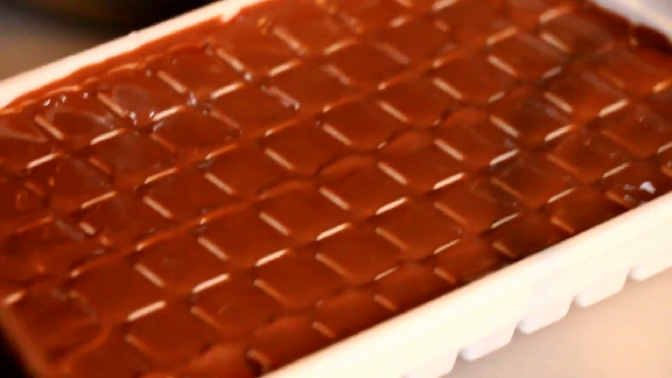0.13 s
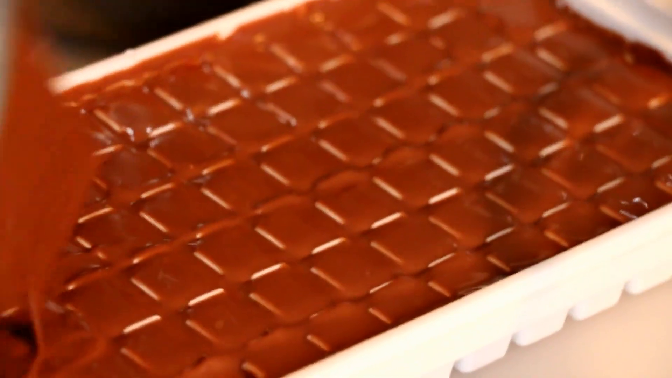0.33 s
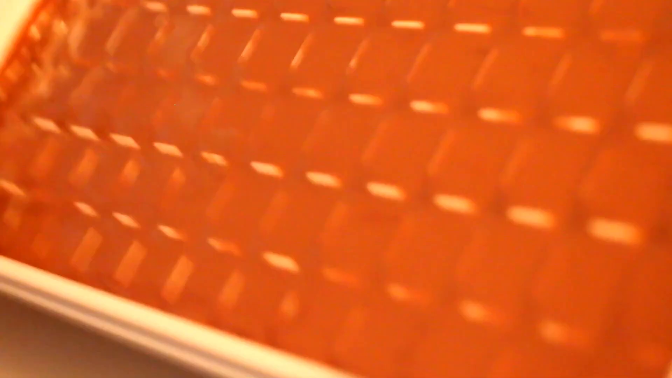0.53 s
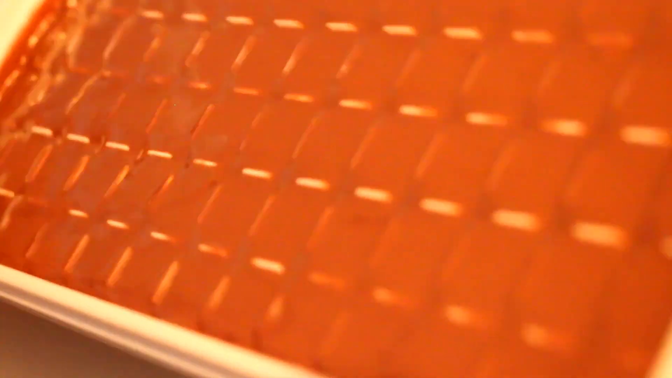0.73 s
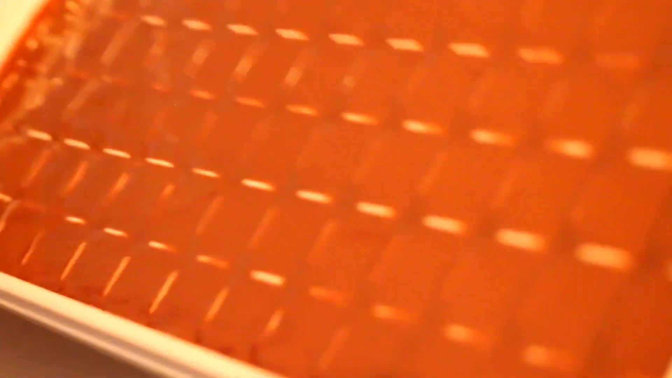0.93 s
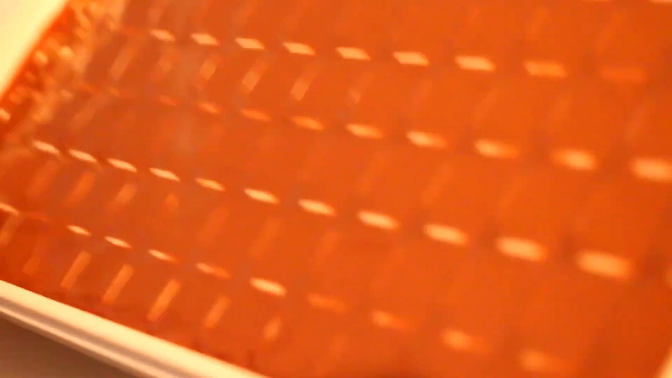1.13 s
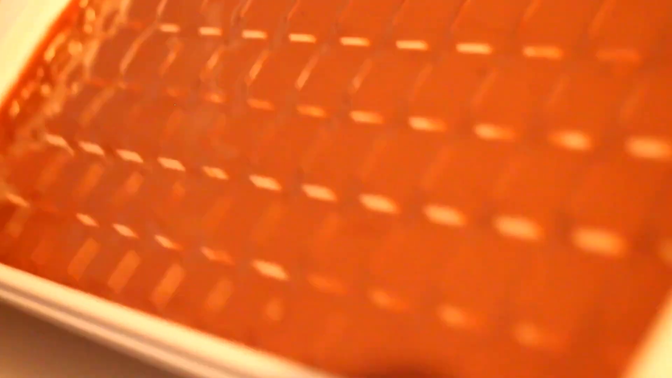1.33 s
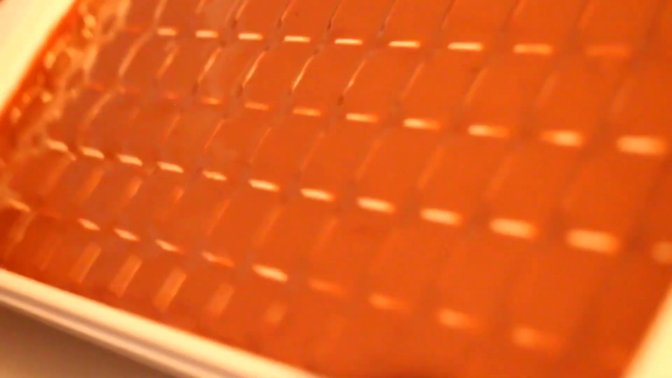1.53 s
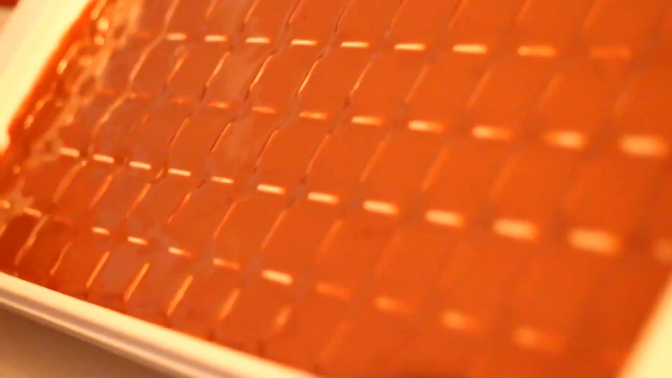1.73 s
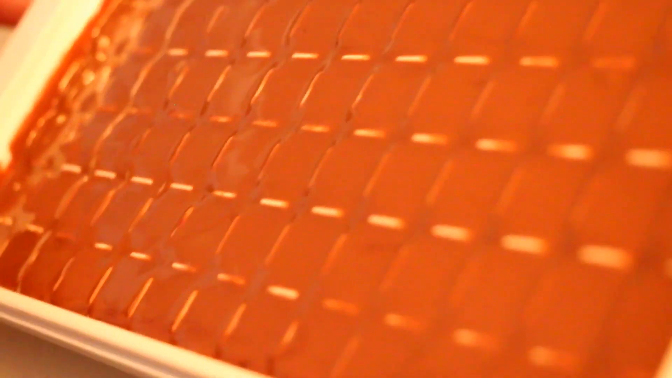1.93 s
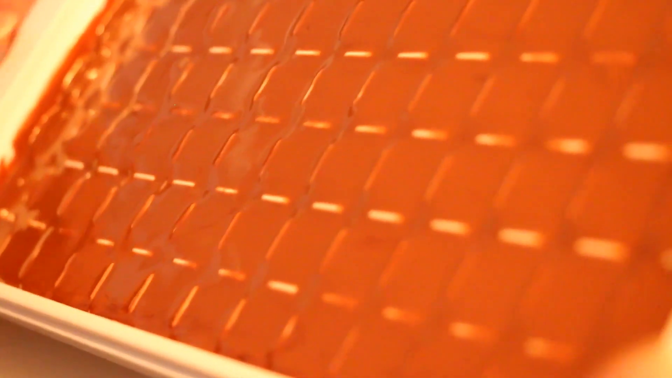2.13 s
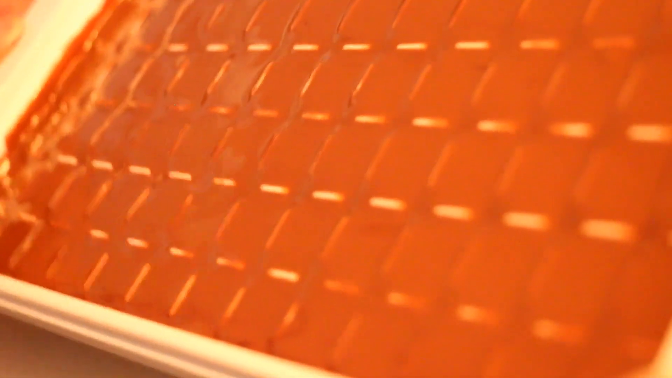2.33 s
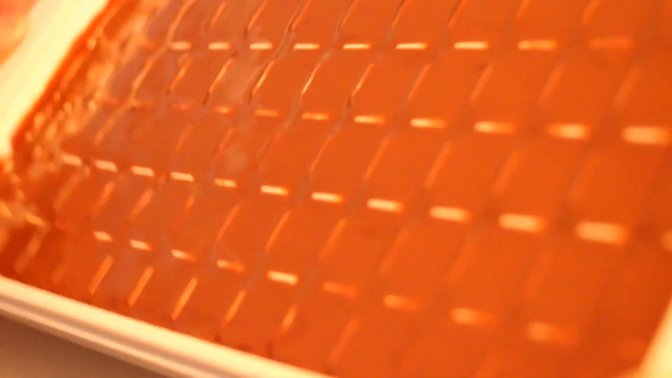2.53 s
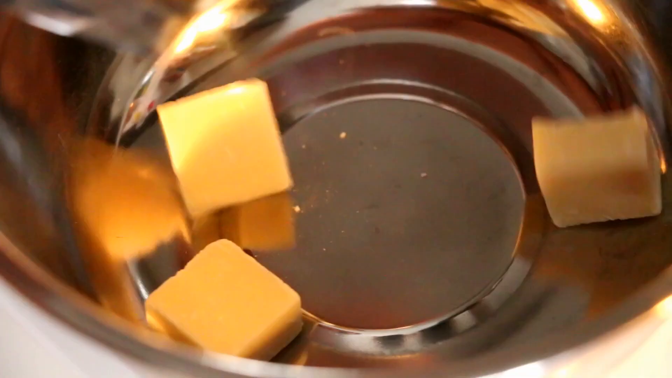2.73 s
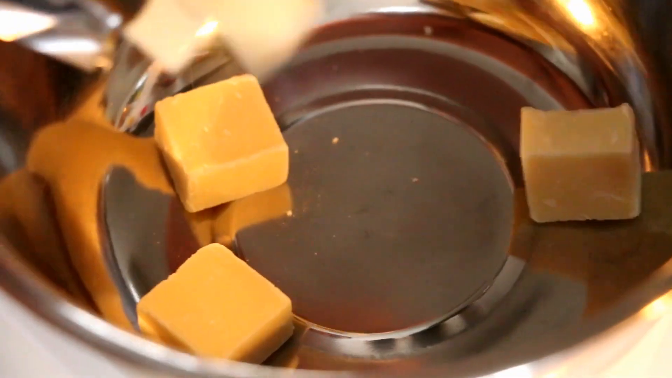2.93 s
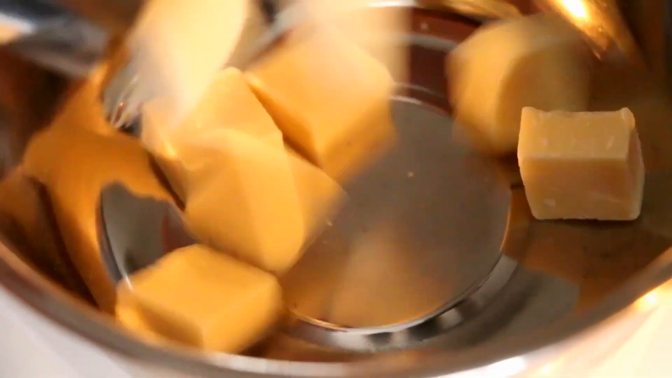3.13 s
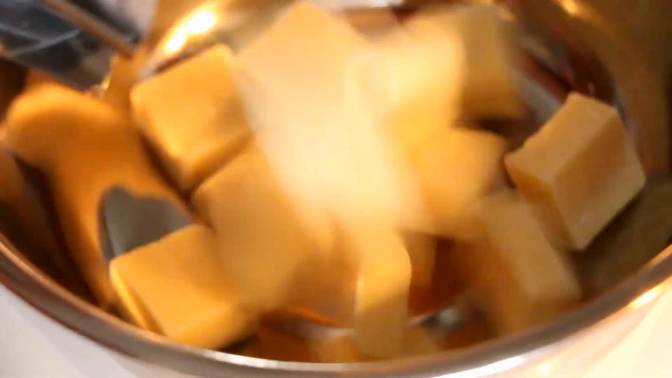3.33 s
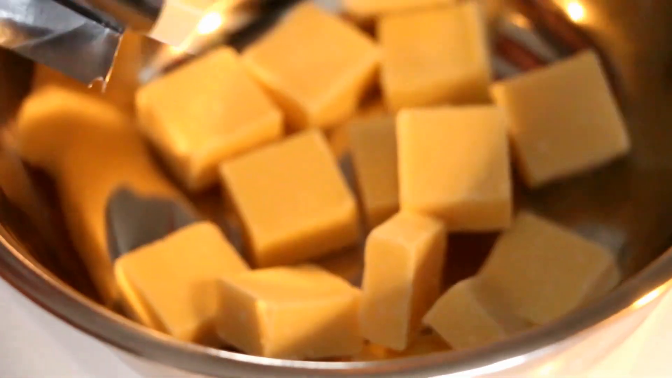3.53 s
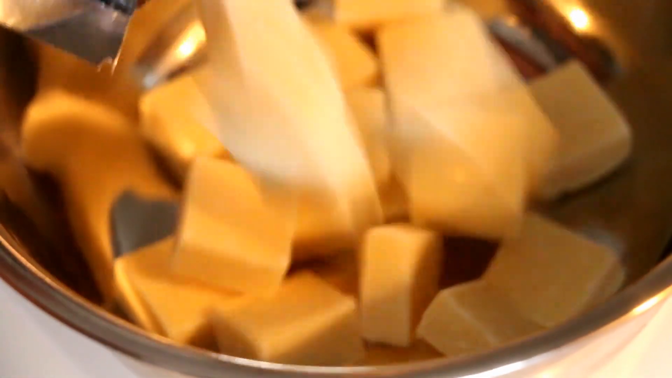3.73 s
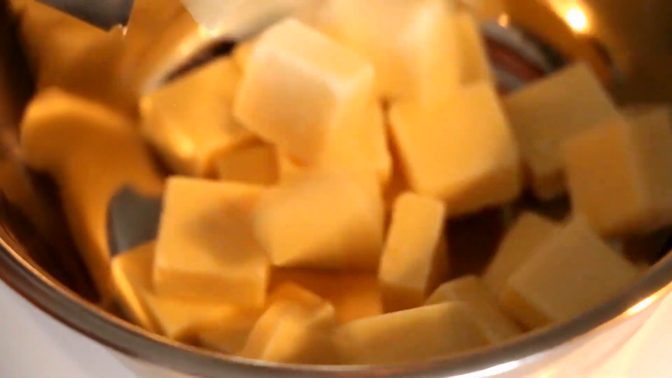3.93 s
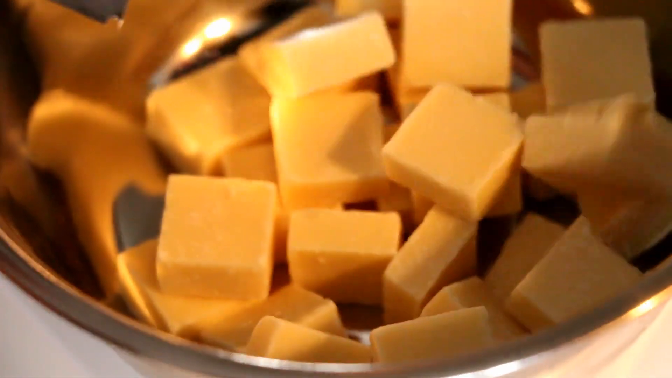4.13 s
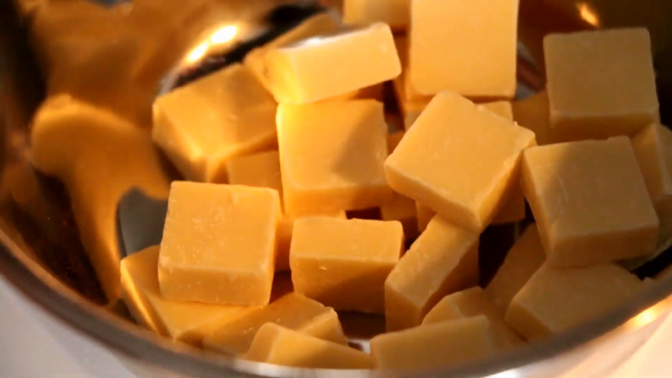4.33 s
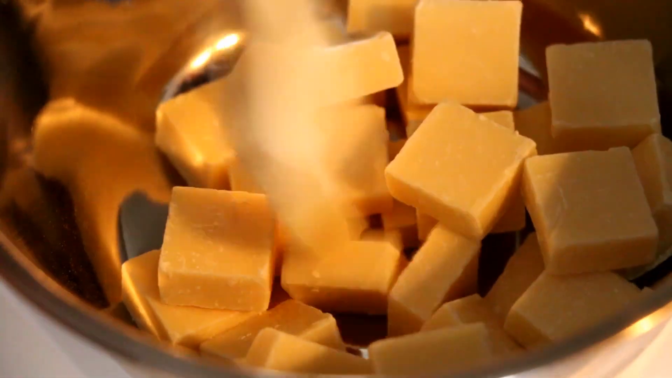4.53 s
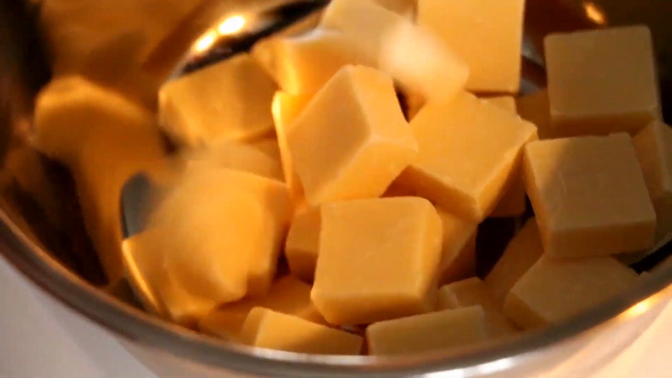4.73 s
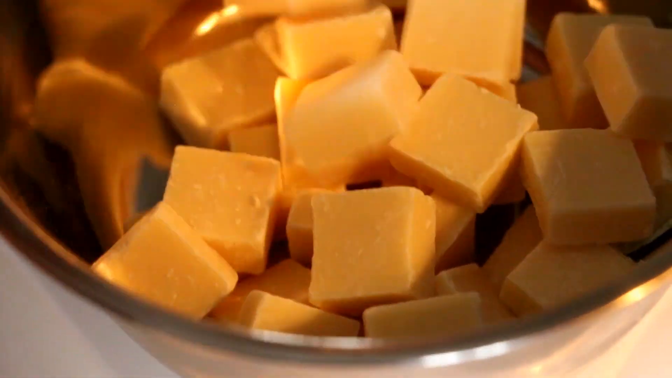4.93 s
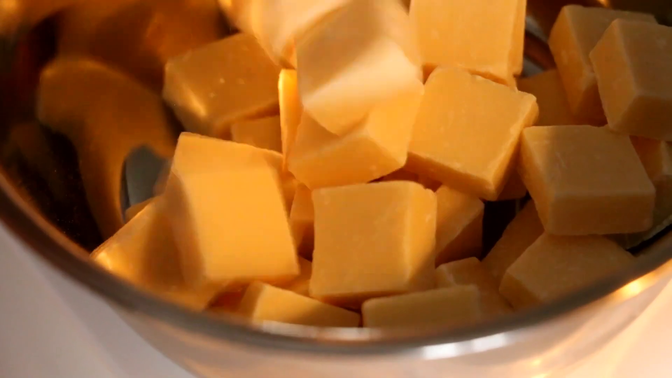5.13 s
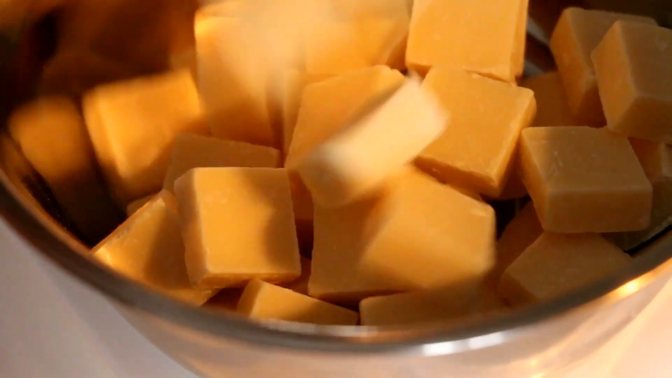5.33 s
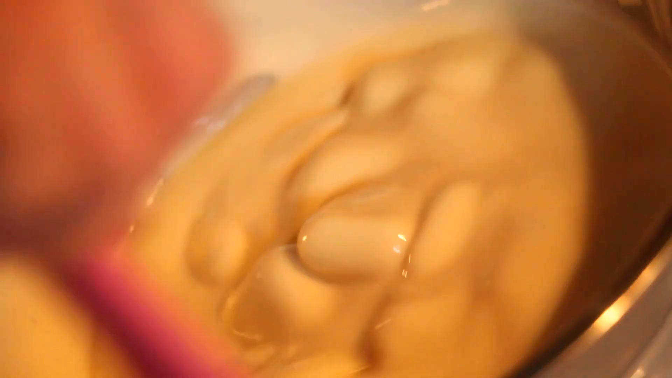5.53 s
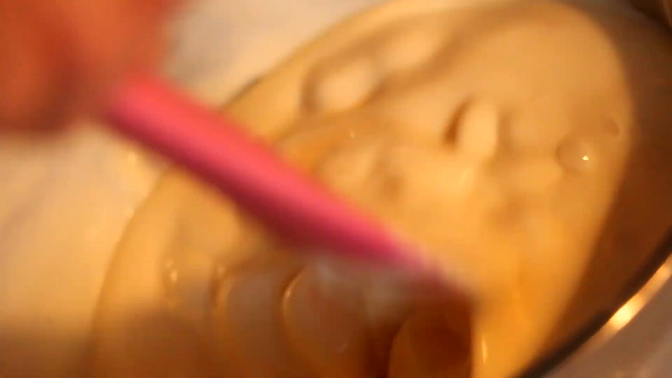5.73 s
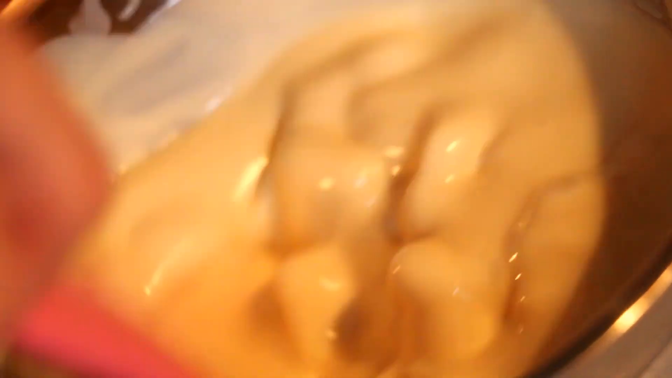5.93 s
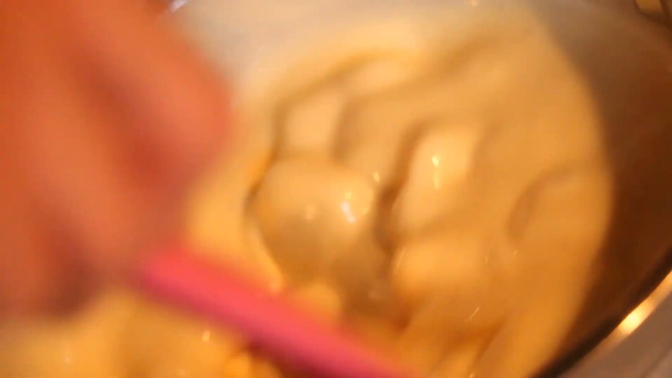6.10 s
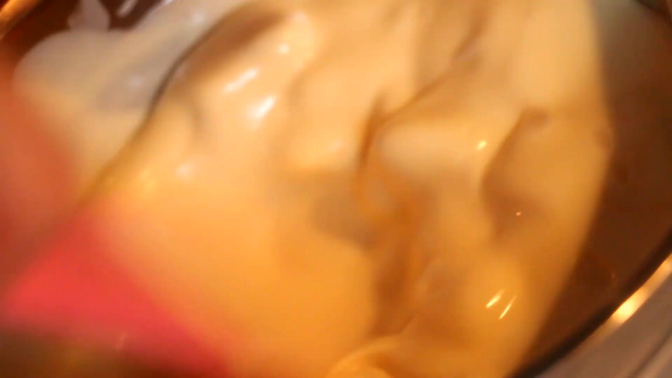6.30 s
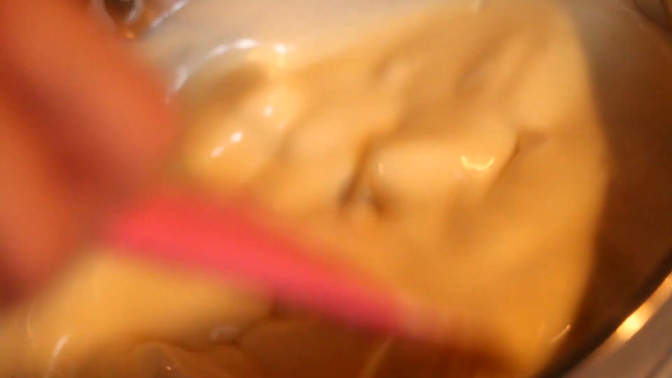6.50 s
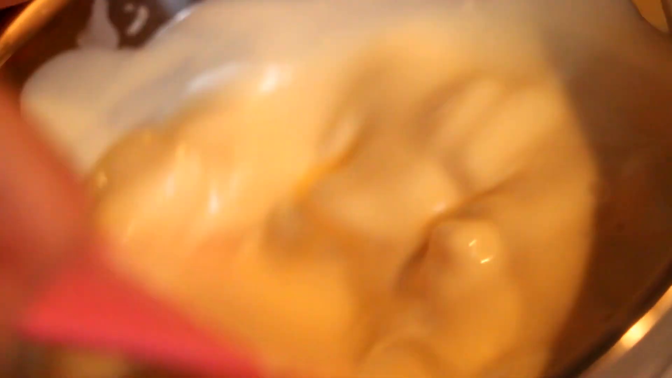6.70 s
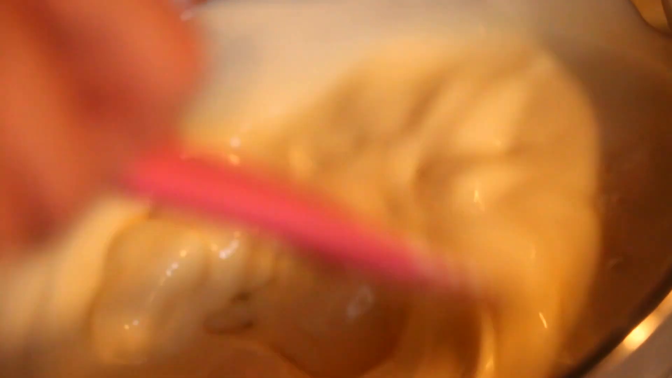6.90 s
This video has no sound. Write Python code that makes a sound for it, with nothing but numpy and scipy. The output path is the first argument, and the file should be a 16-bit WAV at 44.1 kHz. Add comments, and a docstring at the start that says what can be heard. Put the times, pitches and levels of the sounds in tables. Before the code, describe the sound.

Close up in a quiet kitchen, a filled plastic tray knocks down on the counter seven times, fast and firm. A brief gap follows, then hard blocks of chocolate tumble into a steel bowl for nearly three seconds, in an uneven rattle of knocks, clicks and light scrapes, the rim ringing now and then. The rattle cuts off, leaving only the soft hiss and appliance hum that lie underneath throughout.

```python
"""Seven bangs on a kitchen counter, then a clatter of hard chocolate tumbling into a steel bowl.
Each bang is an impact that excites the damped modes of a filled plastic mould. The chocolate blocks
crack against each other and knock the bowl's bottom, which their load damps; the free rim now and then
rings on. A quiet appliance hum and hiss lie under it all, and the loudest blows are softly clipped."""
import sys
import numpy as np
from scipy import signal
from scipy.fft import rfft, irfft
from scipy.io import wavfile

SR = 44100
rng = np.random.default_rng(int(sys.argv[2]) if len(sys.argv) > 2 else 0)


def bounce(signal):
    """Save signal as a 16-bit WAV file at the path given by the first command-line argument."""
    frames = np.transpose(np.atleast_2d(signal))
    limited = np.clip(frames, -1, 1)
    pcm = np.round(limited * 32767).astype(np.int16)
    wavfile.write(sys.argv[1], SR, pcm)


N = 311346

# blocks landing; clack, tick and thud are relative to the level:
# start_s, level_db, clack_db, tick_db, thud_db, bowl_pitch_hz, clack_pitch_hz
LANDINGS = [(2.819, -11, -17, -27, -14, 1330, 2290), (2.861, -8, -18, -16.5, -22.5, 953, 1730),
            (2.868, -15.5, -9, -31, -22.5, 1015, 1920), (2.91, -11, -21, -46, -18, 964, 2580),
            (2.971, -26, -2.5, -3.5, -26, 965, 2210), (3.033, -22, -3.5, -7.5, -21.5, 790, 2800),
            (3.054, -23.5, -25, -28, -2.5, 680, 2240), (3.067, -20.5, -3, -18.5, -32.5, 780, 3200),
            (3.089, -18, -7, -8, -7.5, 790, 2240), (3.118, 7, -18, -24.5, -35.5, 952, 2230),
            (3.128, -7, -30.5, -48.5, -32, 950, 1930), (3.15, -21, -24, -35.5, -26, 1010, 1950),
            (3.174, -2, -23.5, -22, -33.5, 992, 1870), (3.203, -7.5, -7, -22, -23, 1020, 2710),
            (3.21, -13, -9, -23, -29, 1030, 2060), (3.236, -8, -21.5, -28, -27.5, 1054, 3050),
            (3.255, 4.5, -19, -28, -29.5, 1015, 2360), (3.265, -5.5, -32, -35, -38, 964, 2100),
            (3.273, -0.5, -20.5, -32, -48, 1025, 2000), (3.283, -7, -15, -17, -35.5, 1080, 2650),
            (3.29, -5, -38.5, -49, -44, 940, 3900), (3.318, -6, -16, -32, -29, 950, 2320),
            (3.349, -8, -13.5, -36, -26, 925, 2320), (3.368, -7.5, -26, -30, -32, 930, 2420),
            (3.394, 1, -19.5, -34, -28, 1015, 1780), (3.409, -2.5, -13.5, -19, -18.5, 920, 1780),
            (3.417, -6.5, -7.5, -32, -42, 1030, 2550), (3.435, -9.5, -18, -31, -46, 1012, 2730),
            (3.453, -2, -17, -23, -48, 970, 2830), (3.492, -3, -19.5, -39, -28, 710, 2900),
            (3.578, -18.5, -4, -10, -35, 780, 2420), (3.601, -15, -9, -21, -20, 800, 1830),
            (3.636, -12.5, -38, -28.5, -21, 750, 1800), (3.688, -18.5, -12.5, -24, -7.5, 866, 1940),
            (3.753, -25, -6, -27, -4.5, 795, 2210), (3.802, -2.5, -11, -25, -20, 1090, 2560),
            (3.808, 0, -12, -15, -37.5, 1123, 1790), (3.84, -1.5, -15, -34, -20.5, 1130, 2990),
            (3.854, -2, -22, -41, -29, 850, 2360), (3.874, 4.5, -22, -38, -26.5, 745, 2170),
            (3.88, -13, -16, -27, -34, 874, 2400), (3.893, -8.5, -9, -16, -20, 853, 2180),
            (3.928, -11.5, -6.5, -39, -23, 1050, 2400), (3.937, 3, -23.5, -29, -29, 705, 2880),
            (3.975, -3.5, -16, -22, -17, 820, 2260), (4.019, -15.5, -10, -17, -16, 1050, 2480),
            (4.057, -13.5, -8, -21, -35, 1100, 2330), (4.065, -9, -11, -18.5, -12, 950, 2160),
            (4.089, -19, 3.5, -32, -30, 756, 2050), (4.103, -7.5, -9, -24, -31, 620, 2340),
            (4.116, -12.5, -34, -12.5, -15, 930, 2120), (4.172, -19, 1, -16, -35, 844, 1800),
            (4.187, -7, -24, -26, -24, 1150, 2200), (4.309, -20, -36, -37, -35, 713, 2060),
            (4.377, -23, -10.5, -28.5, -13.5, 786, 1800), (4.435, -26.5, -8.5, -45, -6, 870, 3040),
            (4.46, -16.5, -13, -43, -8, 620, 1730), (4.484, -17, -7, -28, -22, 650, 2970),
            (4.549, -21, -11, -19.5, -15, 1270, 2050), (4.573, -25, -14.5, -26, -26.5, 802, 3160),
            (4.63, 4, -12.5, -24.5, -21, 974, 2920), (4.672, -14, -5.5, -25, -10, 1055, 1710),
            (4.704, -18, -4.5, -11, -31, 940, 3540), (4.721, -10.5, -38.5, -26, -16.5, 764, 1930),
            (4.803, -6, -10, -27, -17.5, 735, 2380), (4.85, -11, -15, -29, -31, 765, 2420),
            (4.898, -25.5, -18, -15, 3, 1210, 1850), (4.905, -14.5, -1.5, -9, -9.5, 915, 2280),
            (4.922, 12.5, -28, -33.5, -27.5, 697, 1775), (4.955, -5.5, -43, -16, -36, 735, 2330),
            (5.0, -11, -28, -17.5, -28, 750, 1810), (5.061, -13.5, -36.5, -16, -14, 945, 1870),
            (5.161, -37, -1.5, 3, -14, 1020, 2670), (5.18, -12, -6.5, -17, -8.5, 980, 2920),
            (5.21, -17, -4.5, -43.5, -23, 1010, 2270), (5.225, 1.5, -19.5, -32, -21, 734, 2040),
            (5.231, -7, -14, -16.5, -46, 735, 2250), (5.292, -12, -7, -18.5, -5.5, 997, 1930),
            (5.313, -14.5, -15, -25, -18, 1130, 2860), (5.339, -14, -33, -42, -2, 734, 1750),
            (5.357, -7.5, -7, -39, -25, 1125, 2290), (5.395, -15, -1, -6.5, -38, 1060, 3430),
            (5.449, -9.5, -2.5, -25, -12, 875, 2410), (5.454, -7, -9.5, -22.5, -17, 880, 2910),
            (5.489, -15.5, -13, -17, -39, 1076, 1800), (5.526, -16.5, -9.5, -20, -7, 695, 2740),
            (5.553, -27.5, -5.5, -24, -18, 780, 2860)]
# modes of the bowl's loaded bottom: pitch_hz, level_db
BOTTOM_MODES = [(215, -11), (260, -14), (340, -9), (410, -8), (560, -1.5), (630, -23.5), (735, -3.5),
                (775, -16), (835, 0.5), (870, -18.5), (916, 3.5), (965, -4.5), (1014, 5.5), (1060, -1.5),
                (1113, 2.5), (1234, 0.5), (1470, 1.5), (1580, -1.5), (1790, -3), (2200, -18.5),
                (2500, -5.5), (2860, -4.5), (3400, -27.5)]
# stereo width of the impacts: frequency_hz, side_minus_mid_db
IMPACT_WIDTH = [(60, -24), (110, -22.5), (200, -32), (380, -19.5), (700, -15), (1290, -11.5), (2380, -6),
                (4400, -2), (8120, -1), (15000, -2)]


def undb(db):
    """Amplitude ratio of a level in decibels."""
    return 10 ** (np.asarray(db, float) / 20)


def read(table, hz):
    """Interpolation of a (frequency_hz, value) table on a logarithmic frequency axis."""
    f, v = np.transpose(table)
    return np.interp(np.log(np.maximum(hz, 1)), np.log(f), v)


def impulses(start_s, size):
    """Ideal impacts: one sample of the given size at each time."""
    return np.bincount((np.asarray(start_s) * SR).astype(int), size, N)[:N]


def fade(x, t60):
    """Exponential decay: each impulse falls 60 dB in t60 seconds."""
    return signal.lfilter([1], [1, -1000 ** (-1 / (t60 * SR))], x)


def ring(force, hz, t60):
    """Response of a damped harmonic oscillator to a force."""
    return signal.lfilter([1], [1, -np.exp((2j * np.pi * hz - np.log(1000) / t60) / SR)], force).imag


def cut(x, order, hz, kind):
    """Maximally flat lowpass or highpass filtering."""
    return signal.sosfilt(signal.butter(order, hz, kind, fs=SR, output="sos"), x)


def stereo(mid, side):
    """Left and right as the sum and difference of mid and side."""
    return np.array([mid + side, mid - side])


def noise_bands(spectrum, envelope, width):
    """Third-octave noise bands, each modulated by envelope(hz); mid and side are uncorrelated."""
    out = 0
    for hz in 30 * 2 ** np.arange(0, 9.3, 1 / 3):
        sos = signal.butter(2, [hz * 2 ** (-1 / 6), hz * 2 ** (1 / 6)], "bandpass", fs=SR, output="sos")
        mid, side = signal.sosfilt(sos, rng.standard_normal((2, N)).astype(np.float32))
        out = out + undb(read(spectrum, hz)) * envelope(hz) * stereo(mid, side * undb(read(width, hz)))
    return out


def struck_mode(start_s, size, hz, t60):
    """Free vibration of one mode after each blow, with a random share in the side channel."""
    sway = rng.standard_normal(len(start_s)) * undb(read(IMPACT_WIDTH, hz))
    return stereo(ring(impulses(start_s, size), hz, t60), ring(impulses(start_s, size * sway), hz, t60))


def room_noise():
    """Broadband noise: a hiss that flickers a little over a slowly growing house rumble."""
    # background spectrum: frequency_hz, density_db
    spectrum = [(20, -2), (110, -6), (156, -11), (190, -8), (237, -3.5), (342, -12), (416, -7.5),
                (492, -9.5), (634, -13.5), (750, -11.5), (1000, -14.5), (1790, -20.5), (13600, -31.5),
                (15200, -45), (16500, -48.5)]
    # its stereo width: frequency_hz, side_minus_mid_db
    width = [(60, -15), (110, -12.5), (200, -13), (380, -7.5), (700, -7), (1290, -3.5), (2380, -1),
             (4400, 1), (8120, 0.5), (15000, -1)]
    swell = undb(-3 + 0.92 * np.arange(N) / SR)

    def flicker(hz):
        steps = rng.standard_normal(N // 4000 + 2)
        wander = np.interp(np.arange(N) / 4000, np.arange(len(steps)), steps)
        return undb(min(1.5, 900 / hz) * wander) * (swell if hz < 130 else 1)

    return undb(-34.5) * noise_bands(spectrum, flicker, width)


def appliance_hum():
    """Narrow resonances driven by noise give faint, wavering tones."""
    # hum tones: pitch_hz, level_db
    tones = [(247.6, -65), (737.5, -68), (759.0, -80), (958.2, -68), (1599, -78)]
    hum = 0
    for hz, db in tones:
        tone = ring(rng.standard_normal(N), hz, t60=.3)
        hum = hum + undb(db - 2) * tone / tone.std()
    return hum


def counter_boom():
    """Structure-borne sound: each landing excites one low mode of the counter."""
    start_s, db, _, _, thud_db = np.transpose(LANDINGS)[:5]
    boom = ring(impulses(start_s, undb(db + thud_db - 23.5)), hz=61, t60=0.14)
    return cut(boom, 2, 90, "lowpass")


def mould_bangs():
    """Impact excitation: a snap, the mould's modes, a noisy slap and a reverberant tail."""
    # blows, bounces and light touches: start_s, level_db, thud_db, slap_db, snap_pitch_hz, snap_db
    blows = [(0.616, -38.5, 4, -20, 400, -14), (0.681, 4.5, -14.5, -18, 1800, -7),
             (.901, 3.5, -15, -9, 734, -6), (1.127, 0, -12, -7, 2120, 0),
             (1.3427, -7.5, -11, -13.5, 1540, 1), (1.3466, 3, -12, -16, 800, -18),
             (1.568, 0, -19, -7.5, 906, 3), (1.574, -10, -6.5, -30, 1270, 2),
             (1.782, 1.5, -17, -15, 640, -4.5), (1.958, -2, -13, -10.5, 970, -8),
             (1.967, -15, -16, -21, 1020, 6), (2.643, -37.5, 1, -16, 300, -14)]
    # modes of the filled mould: pitch_hz, level_db, t60_s
    modes = [(56.7, -14, 0.4), (119, -23, 0.99), (207.5, -10.5, 0.42), (247.4, -2.5, 0.36),
             (340, -2.5, 0.33), (472, -3, 0.04), (654, -3, .1), (988, -9, 0.092), (1420, -19.5, 0.084),
             (1774, -10, 0.12), (2260, 1.5, 0.0078), (2690, -4, 0.021), (3350, -2, 0.011)]
    # spectrum of slap and tail: frequency_hz, density_db
    spectrum = [(24, -21.5), (40, -11), (155, -3), (249, -1.5), (283, -1.5), (337, 3), (455, -5),
                (697, -7.5), (2440, -18), (11600, -54.5), (16000, -56.5)]
    # decay of counter and room: frequency_hz, t60_s
    tail_decay = [(60, 0.54), (160, 0.43), (420, 0.29), (1100, 0.24), (2900, 0.19), (7700, 0.16)]
    start_s, db, thud_db, slap_db, snap_hz, snap_db = np.transpose(blows)
    t = np.arange(4000) / SR

    def strength(hz):
        thud_share = read([(250, 0.95), (700, 0), (3000, 0.034)], hz)
        slap_share = read([(250, 0.18), (700, 0), (3000, 0.74)], hz)
        return undb(db + thud_share * (thud_db + 6) + slap_share * (slap_db + 14))

    def envelope(hz):
        slap, slap_t60_s = np.zeros(N), 0.02
        for at, gain in zip(start_s, strength(hz)):
            i = int(at * SR)
            slap[i:i + len(t)] += gain * (1 - np.exp(-t / 0.00054)) * 1000 ** (-t / slap_t60_s)
        hits = impulses(start_s + 0.00095, strength(hz))
        t60 = read(tail_decay, hz)
        return slap + undb(-12) * fade(hits, t60) + undb(-33) * fade(hits, 2.64 * t60)

    body = 0
    for hz, mode_db, t60 in modes:
        size = strength(hz) * undb(mode_db + 1.3 * rng.standard_normal(len(blows)))
        body = body + struck_mode(start_s, size * rng.choice([-1, 1], len(blows)), hz, t60)
    body = cut(body, 2, 3500, "lowpass")  # the plastic flexes, so the modes start softly
    snap = sum(ring(impulses([at], [size]), hz, t60=0.0094)  # the edge that lands first
               for at, size, hz in zip(start_s, undb(db + snap_db), snap_hz))
    bangs = snap + undb(-15) * body + undb(9.5) * noise_bands(spectrum, envelope, IMPACT_WIDTH)
    return cut(bangs, 3, 50, "highpass")  # the counter gives little deep bass


def rim_ring():
    """Lightly damped steel modes ring after each blow and flutter as blocks brush the wall."""
    # blows on bare steel: start_s, low_ring_db, middle_ring_db, high_ring_db, favoured_pitch_hz
    clinks = [(3.2745, -41, -44.5, -38, 10000), (3.3674, -42.5, -53, -43, 10000),
              (3.5029, -34, -36.5, -29, 6850), (3.8077, -38.5, -36.5, -31, 7600),
              (3.896, -26.5, -43, -19, 6400), (3.938, -31, -29.5, -21, 7400), (3.9994, -40, -38, -31, 9500),
              (4.0654, -22, -50, -30, 7000), (4.117, -38, -39, -24.5, 8000),
              (4.1404, -27, -34.5, -31.5, 9000), (4.2014, -30.5, -42, -33, 8000),
              (4.692, -58, -41.5, -46, 7500), (4.8993, -23.5, -36, -22.5, 8000),
              (4.9559, -50, -29, -16, 6600), (4.9986, -28, -32, -25, 8000), (5.2929, -33, -50, -29, 8000),
              (5.3956, -30, -39.5, -28, 9800), (5.4909, -49, -46, -40, 9000)]
    # modes of the free rim, some in close pairs: pitch_hz, level_db, t60_s
    modes = [(1225, -5.5, 0.37), (1400.6, -7.5, 0.8), (2115, -18.5, 1), (4740, -7.5, 0.92),
             (4830, -13, 0.33), (5030, -6.5, 0.31), (4970, -1.5, 0.41), (4950, -10, 0.33), (5100, -4, 0.23),
             (6380, -4, 0.065), (6380, -27, 0.39), (6400, -20.5, .25), (7100, -18, 0.15), (7600, -15, 0.16),
             (8400, -38.5, 0.17), (8860, -17.5, 0.2), (9430, -17, 0.18), (9240, -16, .2),
             (10260, -11, 0.26), (10500, -15.5, .15), (10700, -15.5, 0.11), (10700, -8.5, 0.083),
             (11380, -8, 0.12), (12300, -10, 0.081), (13500, -12, .08)]
    start_s, low_db, middle_db, high_db, favoured_hz = np.transpose(clinks)
    out = 0
    for hz, db, t60 in modes:
        near_db = high_db - 18 * np.abs(np.log2(hz / favoured_hz))
        blow_db = low_db if hz < 3000 else middle_db if hz < 5700 else near_db
        steps = rng.standard_normal(N // 250 + 2)
        flutter = np.interp(np.arange(N) / 250, np.arange(len(steps)), steps)
        size = undb(blow_db + db + 1.5 * rng.standard_normal(len(clinks)))
        out = out + undb((.5 + hz / 2200) * flutter) * struck_mode(start_s, size, hz, t60)
    return out


def bottom_knocks():
    """Modal response: the struck spot selects bottom modes, over a thud and the block's own clack."""
    t = np.arange(8000) / SR
    out = np.zeros((2, N))
    mode_hz, mode_db = np.transpose(BOTTOM_MODES)
    contact = 1 - np.exp(-t / 0.00066)  # chocolate yields, so the force takes a moment to build
    for start_s, db, clack_db, _, thud_db, centre_hz, clack_hz in LANDINGS:
        octaves_off = np.abs(np.log2(mode_hz / centre_hz))
        near_db = np.where(mode_hz < 500, thud_db + 6.5, -16 * np.minimum(octaves_off / 0.23, 1))
        hz = np.append(mode_hz * (1 + 0.016 * rng.standard_normal(len(mode_hz))), clack_hz)
        partial_db = np.append(mode_db + near_db - 13.5, clack_db - 6)
        gain = undb(db + partial_db + 0.54 * rng.standard_normal(len(hz)))
        # harder landings and higher modes die sooner; louder clacks last longer
        mode_t60 = np.clip(0.1 * np.exp(-db / 33.5), .01, .3) * (mode_hz / 1000) ** -.4
        t60 = np.append(mode_t60, 0.089 * np.exp((db + clack_db) / 30.5))
        waves = contact * np.sin(2 * np.pi * hz[:, None] * t) * 1000 ** (-t / t60[:, None])
        side_gain = gain * undb(read(IMPACT_WIDTH, hz)) * rng.standard_normal(len(hz))
        i = int(start_s * SR)
        out[:, i:i + len(t)] += stereo(gain @ waves, side_gain @ waves)
    return out


def contact_noise(ticks, slide):
    """Brief contacts and sliding friction radiate broadband noise: cracks, ticks and scraping."""
    # spectrum of block contacts: frequency_hz, density_db
    spectrum = [(35, -58), (60, -36.5), (393, -7), (475, -22.5), (724, -3), (1130, -18.5), (1330, -9),
                (2970, -14), (11900, -26.5), (15400, -41.5), (16500, -59)]
    start_s, db, clack_db, tick_db, thud_db = np.transpose(LANDINGS)[:5]

    def envelope(hz):
        bright = np.clip(np.log(hz / 3000) / np.log(2.3), 0, 1)
        body_db = clack_db + 14 if hz > 600 else thud_db + 18
        hits = impulses(start_s, undb(db + (1 - bright) * body_db + bright * (tick_db + 21)))
        click = undb(1) * fade(hits, 0.0027) * (1500 < hz < 10000)  # first touch of a hard edge
        crack = fade(hits, 0.012) - fade(hits, 0.0014)  # builds over a moment
        bowl_tail = undb(-8) * fade(hits, 0.18 * (hz / 1000) ** -.2)
        room_tail = undb(-27) * fade(hits, 0.22)
        return click + crack + bowl_tail + room_tail + undb(2.5) * fade(ticks, 0.015) + undb(8) * slide

    return noise_bands(spectrum, envelope, IMPACT_WIDTH)


def tumbling_blocks():
    """Superposed impacts: many small random collisions rattle the bowl among the main landings."""
    # strength of tumbling and sliding: time_s, knock_db, scrape_db
    tumbling = [(2.78, -74, -61), (2.88, -61.5, -40.5), (3.17, -37, -50), (3.34, -22.5, -42),
                (3.45, -31, -31.5), (3.56, -28.5, -37.5), (3.65, -35, -47), (3.85, -43, -40),
                (3.97, -24, -31.5), (4.06, -19, -36), (4.2, -39, -31), (4.28, -50, -45.5),
                (4.62, -50, -42.5), (4.86, -35.5, -49), (4.98, -22.5, -26.5), (5.08, -34.5, -32.5),
                (5.35, -35, -48.5), (5.42, -24, -33.5), (5.6, -56, -62)]
    time_s, knock_db, scrape_db = np.transpose(tumbling)
    t = np.arange(N) / SR
    count = 1500
    start_s = rng.uniform(time_s[0], time_s[-1], count)
    extra_db = np.minimum(1.1 * rng.exponential(size=count), 6)
    knock = undb(np.interp(start_s, time_s, knock_db) + extra_db)
    ticks = impulses(start_s, undb(np.interp(start_s, time_s, scrape_db) + extra_db))
    slide = undb(np.interp(t, time_s, scrape_db, -150, -150))
    rattle = 0
    for hz, db in BOTTOM_MODES:
        size = knock * undb(db) * rng.standard_normal(count)
        rattle = rattle + struck_mode(start_s, size, hz, t60=0.097 * (hz / 1000) ** -.4)
    bowl = bottom_knocks() + undb(-24) * rattle + rim_ring() + contact_noise(ticks, slide)
    # a quick fade cuts off the clatter and its ringing, while the room noise goes on
    fade_out = np.clip((5.58 - t) / .025, 0, 1)
    return cut(fade_out * bowl, 3, 170, "highpass")  # a small bowl radiates little bass


def scene():
    """Linear superposition of all sources."""
    return mould_bangs() + tumbling_blocks() + counter_boom() + room_noise() + appliance_hum()


def record(dry):
    """Slightly unequal channel responses, soft saturation of the peaks and a steep treble cut."""
    # channel balance: frequency_hz, left_minus_right_db
    balance = [(60, -1), (110, -0.5), (200, 0.0), (380, -0.5), (700, 0.0), (1290, -0.5), (2380, -1.5),
               (4400, -1), (8120, 0), (15000, 1)]
    lean = undb(read(balance, np.fft.rfftfreq(N, 1 / SR)) / 2)
    channels = irfft(rfft(dry) * np.array([lean, 1 / lean]), N)
    limited = channels / (1 + np.abs(channels) ** 16) ** (1 / 16)
    return signal.sosfilt(signal.ellip(10, .2, 70, 16300, fs=SR, output="sos"), limited)


dry = scene()
out = record(dry)
bounce(out)
```